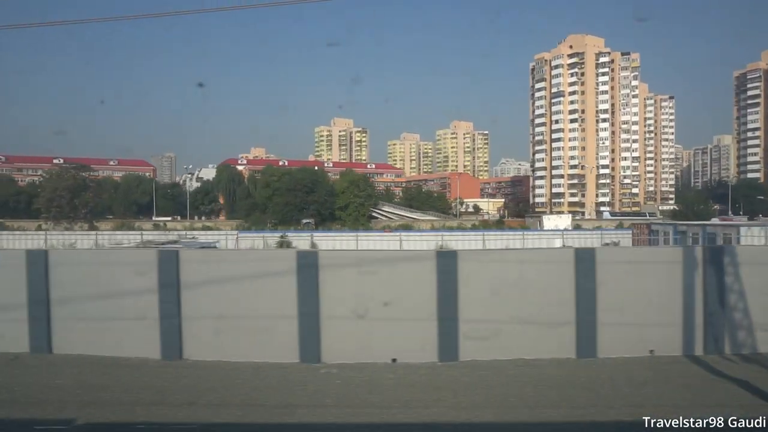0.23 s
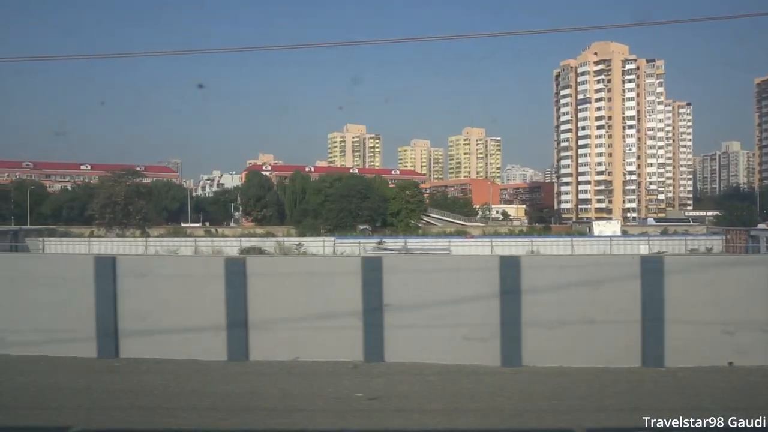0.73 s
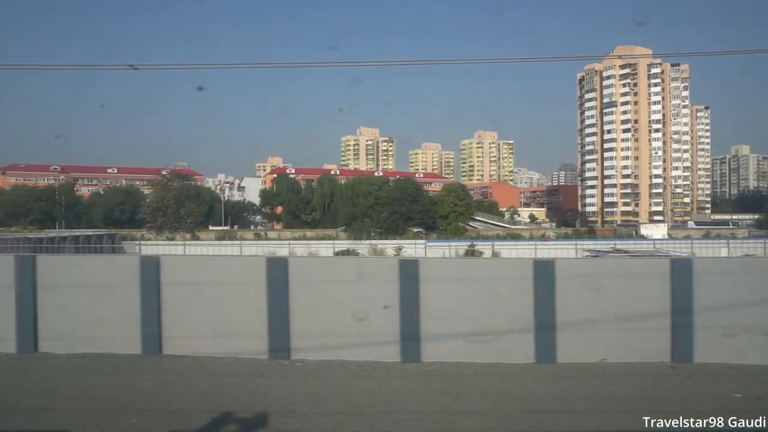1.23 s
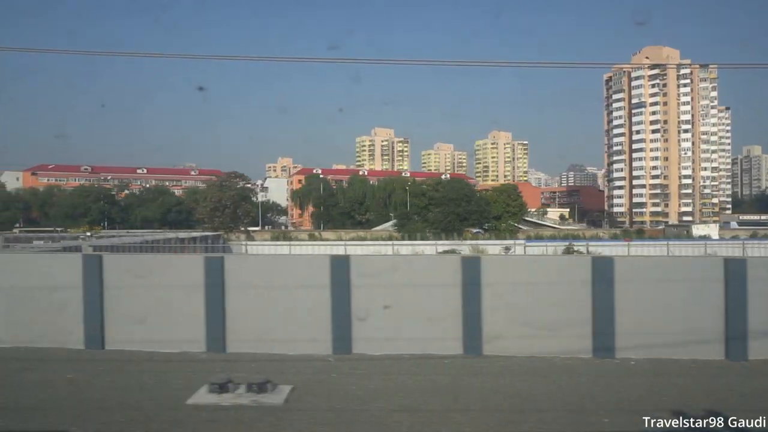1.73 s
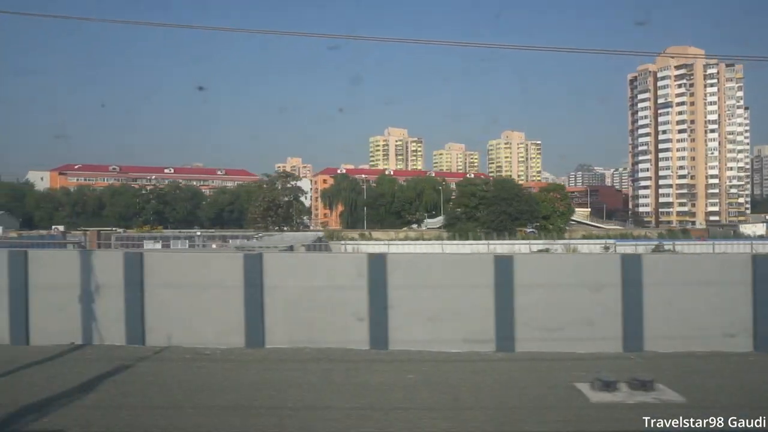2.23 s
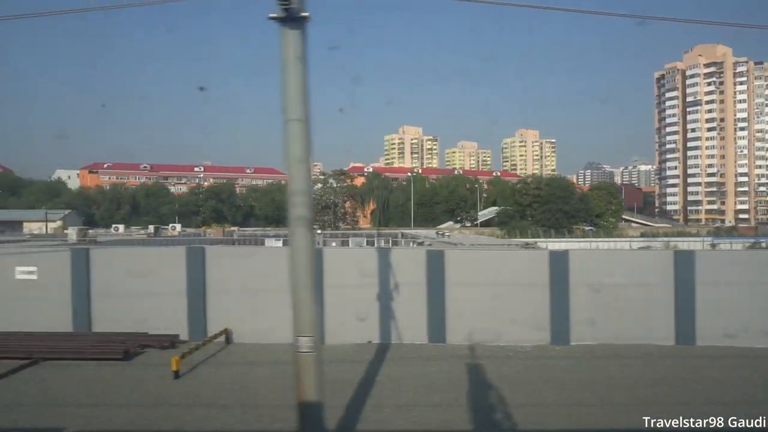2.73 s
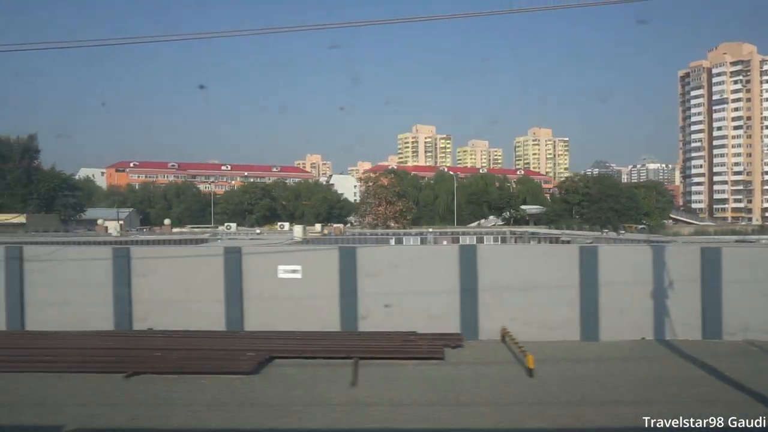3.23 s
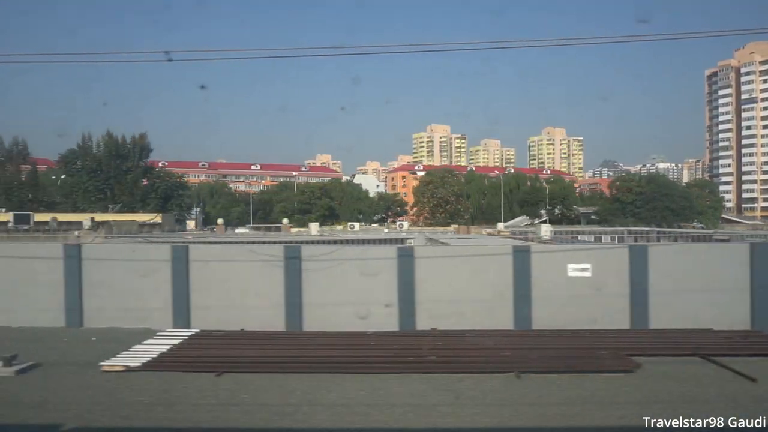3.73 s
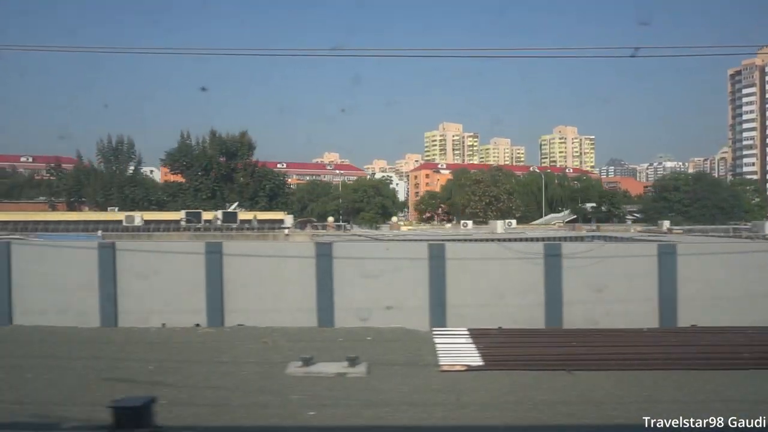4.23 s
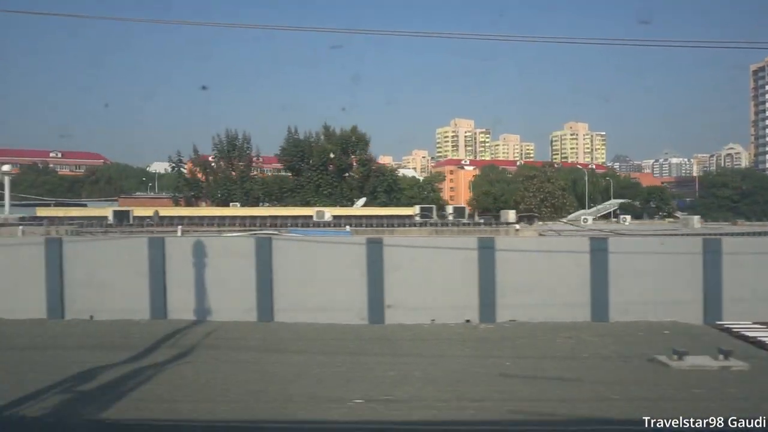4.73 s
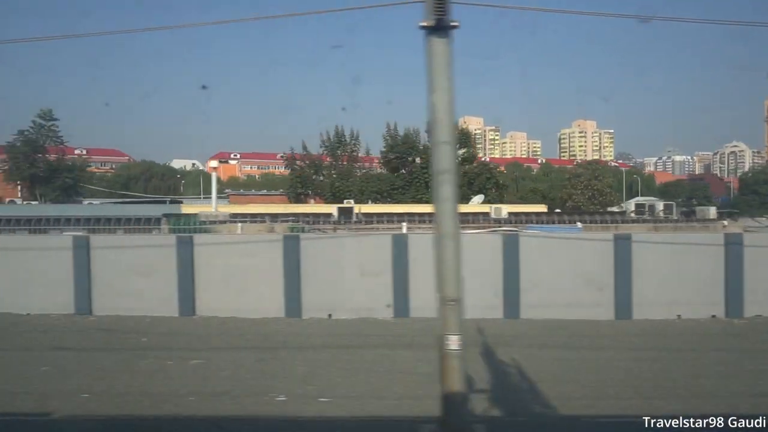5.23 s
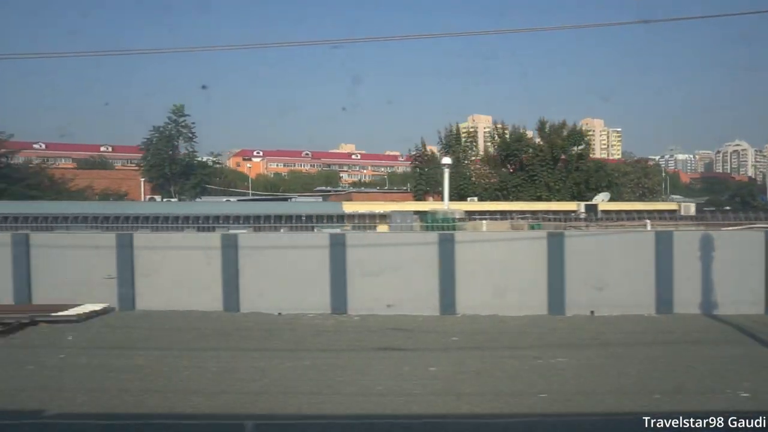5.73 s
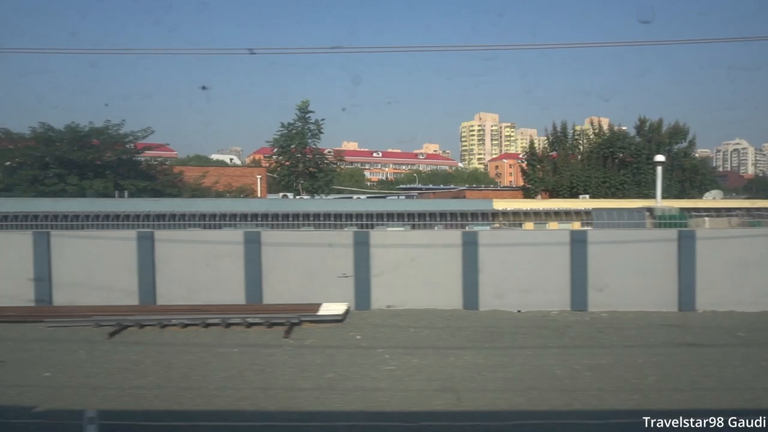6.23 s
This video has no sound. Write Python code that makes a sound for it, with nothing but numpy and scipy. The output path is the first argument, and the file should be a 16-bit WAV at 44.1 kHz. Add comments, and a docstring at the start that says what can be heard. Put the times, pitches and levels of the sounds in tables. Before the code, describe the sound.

A steady bass-heavy train rumble heard from a passenger seat, swelling with soft dull knocks around two seconds, then settling into calmer rolling.

```python
"""Rolling noise in a railway carriage: rough wheels and rails excite the floor and panels as filtered noise.
The two lowest cabin resonances boom as wavering tones; axles jolt over rail joints in bursts of noise.
The drive hums and the wheels sing as fuzzy tones, air rushes by as noise, and loose fittings ring briefly.
Thin ticks sound on the right, and a faint whine sinks at the start.
Two close microphones, alike in the bass, add hiss."""
import sys
import numpy as np
from scipy import signal
from scipy.fft import rfft, irfft
from scipy.io import wavfile
from scipy.ndimage import uniform_filter1d

SR = 44100
rng = np.random.default_rng(int(sys.argv[2]) if len(sys.argv) > 2 else 0)


def put_to_file(sound):
    """Save the sound as 16-bit audio at rate SR, in the file named by the first command-line argument."""
    columns = np.atleast_2d(sound).T  # one column per channel
    safe = np.clip(columns, -1, 1)
    whole_steps = np.round(safe * 32767)
    wavfile.write(sys.argv[1], SR, whole_steps.astype(np.int16))


N = 285768
T = np.arange(N) / SR  # time/s
HZ = np.fft.rfftfreq(N, 1 / SR)  # bin frequency/Hz

# Roughness of the track, felt by booms, underframe and floor: [t/s, roughness/dB]
TRACK_ROUGHNESS = [(0, 4.5), (.4, 0.5), (.8, 3), (1.3, -1.5), (1.7, 1.5), (2.3, 3), (3.0, 3.5), (3.3, 1),
                   (3.7, -1), (3.9, -1), (4.4, -1.5), (4.7, -2), (5.3, -1), (5.9, 0), (6.2, -1),
                   (6.48, -5.5)]
# Sway below the boom: [t/s, level/dB]
SWAY_LEVEL = [(0, -38), (.7, -38.5), (1.3, -37.5), (2, -35), (2.7, -37), (3.2, -36), (3.7, -40.5),
              (4.2, -35), (4.7, -40.5), (5.3, -39), (5.9, -36), (6.48, -39)]
# Panels and windows: [t/s, level/dB]
PANEL_LEVEL = [(0, -59), (.5, -59.5), (1.0, -62.5), (1.7, -59.5), (2.7, -60), (2.95, -58.5), (3.25, -58),
               (3.6, -61), (4.1, -60.5), (5.0, -60.5), (6.0, -60), (6.48, -60.5)]
# Spectra of sway, underframe, floor and panels, shape only: [f/Hz, density/dB per Hz]
SWAY_SPECTRUM = [(10, -16), (20, -8), (28, -4), (35, -5), (48, 0), (58, -3), (66, -4), (76, -20)]
FRAME_SPECTRUM = [(95, -23), (125, 5.5), (150, -2), (170, -0.5), (225, 1), (245, -6.5), (290, -40)]
FLOOR_SPECTRUM = [(100, -10), (200, -10.5), (260, -1), (330, -4.5), (450, -4), (620, -17), (800, -32.5)]
PANEL_SPECTRUM = [(450, -44), (620, -1.5), (900, -1.5), (1300, -8.5), (1700, -6), (2100, -12.5),
                  (2400, -16), (3200, -28)]
# Resonances of the carriage body: [f/Hz, width/Hz, level over the spectrum around it/dB]
BODY_MODES = [(154, 20.4, 3.5), (192.6, 9.8, 7), (223.6, 10.5, 3.5), (278, 32, 3), (860, 14, 4.5),
              (1088, 29, 5), (1376, 18, 5), (1520, 27, 5), (1826, 120, 3.5), (2053, 45, 5.5), (2684, 27, 4),
              (3940, 23, 5)]
# (level on even track/dB, dB gained per dB of roughness)
FRAME_RIDE, FLOOR_RIDE = (-44, 0.65), (-50, 0.47)
# Random swells of the underframe: (width/s, depth/dB)
FRAME_SWELLS = 0.04, 1.03

# Lower and upper boom: [level on even track/dB, dB gained per dB of roughness]
BOOM_RIDES = (-38, 0.72), (-41, 1.06)
# Surges where the bogie meets a dip: [t/s, lower boom level/dB, upper boom level/dB, length/s]
BOOM_SURGES = [(0.053, -31, -52, 0.054), (0.361, -41, -34.5, 0.091), (0.777, -44, -38, 0.069),
               (1.62, -36, -30, 0.04), (1.795, -39, -30.5, 0.099), (1.929, -26, -51, 0.04),
               (2.175, -23.5, -28.5, 0.035), (2.462, -33, -34.5, 0.077), (2.688, -44, -34, 0.069),
               (2.866, -24, -38, 0.13), (3.057, -27, -46, 0.038), (3.526, -34, -55, 0.19),
               (5.0, -34, -30, 0.049), (5.337, -32, -38, 0.026), (5.999, -47, -32, 0.063),
               (6.426, -26, -31.5, 0.029)]
LOWER_BOOM_HZ, UPPER_BOOM_HZ = 80.7, 99.37
BOOM_FLUTTER = 0.023, 2.37  # (width/s, depth/dB)
SURGE_RISE_S, SURGE_FALL_S = 0.022, 0.031

# Axles over rail joints: [t/s, underframe drum level/dB, drum f/Hz, thud level/dB,
# clatter level/dB, clack level/dB, length of drum and thud/s]
AXLE_JOLTS = [(0.557, -41.5, 220, -55, -59, -78, 0.068), (0.939, -46, 200.3, -51.5, -57, -69, 0.1),
              (1.158, -50, 209.5, -62, -59, -72, 0.05), (1.323, -50, 155, -50.5, -59, -73, 0.073),
              (1.53, -36.5, 219.2, -54, -80, -80, 0.027), (1.662, -32, 158.1, -39, -48.5, -56.5, 0.075),
              (1.809, -26.5, 206.5, -33.5, -43.5, -51, 0.063),
              (1.866, -30.5, 174.9, -35.5, -59, -65, 0.032), (2.048, -39, 134, -53, -61, -75, 0.087),
              (2.359, -40.5, 202, -50, -61, -82, 0.07), (2.576, -30.5, 190, -46, -52, -67, 0.024),
              (2.612, -26.5, 208.3, -47, -65, -77, 0.021), (2.712, -42, 215, -45.5, -51, -68, 0.079),
              (2.765, -42.5, 198, -48, -56, -65, 0.065), (2.944, -36, 198, -45, -56, -66, 0.061),
              (3.051, -37, 218.8, -54, -60, -70, 0.039), (3.093, -39, 215.5, -56, -53.5, -72, 0.058),
              (3.436, -39.5, 196, -58, -70, -80, 0.045), (3.671, -39.5, 221, -56, -63, -81, 0.069),
              (3.946, -42, 206.8, -54, -73, -80, 0.041), (4.2, -41, 125.4, -57, -63, -81, 0.056),
              (4.307, -39, 159, -74, -64, -83, 0.1), (5.473, -59, 210, -46, -53.5, -78, 0.027),
              (5.822, -53, 209, -55, -57.5, -69, 0.13)]
# Spectra of three parts of a jolt, shape only: [f/Hz, density/dB per Hz]
THUD_SPECTRUM = [(120, -23), (200, 2.5), (300, 11.5), (400, 11.5), (520, 9.5), (650, -6.5)]
CLATTER_SPECTRUM = [(400, -31), (580, 1), (900, 0), (1100, -6), (1300, -12), (1700, -25)]
CLACK_SPECTRUM = [(1000, -40), (1300, -11), (1550, -1), (1800, -6), (2100, -7.5), (2400, -34), (3200, -68)]
# The firm note in thud, clatter and clack: [f/Hz, width/Hz, level relative to the part/dB]
JOLT_NOTES = [(383.6, 51.2, -8.5), (711, 85.6, -9), (1530, 170, -4)]
DRUM_NOTE = 34, 0.089  # the drum's note: (width/Hz, level relative to the part/dB)

# Hums of the drive: [t/s, lower hum level/dB, upper hum level/dB]
HUM_LEVELS = [(0, -56, -67.5), (.8, -56, -70.5), (1.02, -57.5, -59.5), (1.25, -55, -64.5),
              (1.55, -50.5, -67.5), (1.85, -53, -59), (2.15, -48.5, -69), (2.38, -47.5, -56.5),
              (2.6, -57, -67), (2.78, -45, -66), (3.1, -59, -63), (3.7, -52.5, -58), (4.0, -56.5, -67),
              (4.4, -53, -60), (4.98, -58, -66), (5.23, -48.5, -63.5), (5.6, -51.5, -67),
              (6.0, -54.5, -65.5), (6.48, -59, -73)]
LOWER_HUM_HZ, UPPER_HUM_HZ = 375, 714
HUM_FLUTTER = 0.04, 1  # (width/s, depth/dB)

# Rough singing of wheel on rail: [t/s, level/dB]
SINGING_LEVEL = [(0, -77), (.45, -74), (.9, -75), (1.4, -76), (2.0, -74), (2.85, -81), (3.0, -70),
                 (3.3, -75), (3.6, -76), (4.9, -75), (5.2, -73), (5.6, -79), (6.0, -76), (6.48, -73)]
SINGING_HZ, SINGING_WIDTH_HZ = 1763, 170

# Air past the windows: [t/s, rush level/dB, whistle level/dB]
AIR_LEVELS = [(0, -68, -96), (2.7, -66, -91), (3.05, -65.5, -76), (3.5, -66.5, -82), (4.7, -66.5, -80),
              (5.2, -67, -83), (6.48, -66.5, -88)]
# Spectrum of the rush, shape only: [f/Hz, density/dB per Hz]
AIR_SPECTRUM = [(1000, -36), (2000, -6.5), (2700, -1.5), (4000, -5.5), (5000, -9), (7000, -23),
                (11500, -33)]
WHISTLE_HZ = 3550

# Rings of loose fittings: [t/s, level/dB, f/Hz, width/Hz, length/s, noise over tone]
FITTING_PINGS = [(.282, -62.5, 1765, 40, 0.04, .3), (1.17, -59.5, 1750, 60, 0.046, 0.92),
                 (3.026, -55.5, 948.4, 35, 0.036, 0.28), (6.112, -64, 1750, 220, 0.044, 2.5),
                 (6.182, -65.5, 1840, 220, 0.055, 2.5), (6.431, -60, 2160, 500, .08, 2.1)]
# Thin ticks: [t/s, peak level/dB, f/Hz, left minus right/dB, rattle level/dB, rattle length/s]
THIN_TICKS = [(.1136, -57, 8050, -1.5, -72, 0.017), (2.738, -60, 10300, -3, -66, 0.023),
              (2.835, -50.5, 10100, -7, -71, 0.054), (3.277, -54, 10100, -6, -71, .02),
              (3.328, -49, 10030, -6, -68, 0.028), (4.272, -57, 9620, -2.5, -70, 0.053),
              (4.635, -68, 9600, -2.5, -77, .03)]
# Sinking whine: [t/s, level/dB, f/Hz]
WHINE_GLIDE = [(0, -79, 513), (.1, -54, 497), (.3, -55.5, 477), (.45, -69, 462), (.6, -51, 451),
               (.75, -69, 458), (1.0, -65, 435), (1.2, -80, 425)]

# The field at the microphones: [f/Hz, left-right coherence]
COHERENCE = [(40, 0.99), (90, 1), (180, 0.99), (350, 1), (800, 0.62), (1600, 0.21), (3000, 0.093),
             (11000, 0.19)]
# [f/Hz, phase by which left leads/rad]
LEFT_LEAD = [(60, 0), (180, 0.2), (350, 0.49), (600, 0.79), (1800, 1), (2800, 0), (4000, 0)]
# [f/Hz, left minus right/dB]
LEFT_TILT = [(60, 0.1), (800, 0.3), (1500, -1.1), (11000, -0.5)]
# Spectrum of the hiss, shape only: [f/Hz, density/dB per Hz]
HISS_SPECTRUM = [(1500, -17), (4000, -11), (6000, -1), (11500, -3)]
HISS_DB, BAND_EDGE_HZ = -67.5, 11050


def rolling():
    """Forced vibration: one contact roughness drives underframe, floor and panels; sway lies beneath."""
    contact = unevenness(0.035, 1.3)
    sway = gain_of(curves(SWAY_LEVEL)[0]) * carriage(SWAY_SPECTRUM, 1)
    # underframe and panels follow the contact less than the floor does
    frame_drive = ridden(FRAME_RIDE) * contact ** 0.46 * evened(unevenness(*FRAME_SWELLS))
    panel_drive = gain_of(curves(PANEL_LEVEL)[0]) * contact ** 0.47
    frame = carriage(FRAME_SPECTRUM, frame_drive)
    floor = carriage(FLOOR_SPECTRUM, ridden(FLOOR_RIDE) * contact)
    panels = carriage(PANEL_SPECTRUM, panel_drive)
    return sway + frame + floor + panels


def boom():
    """Modal resonance: the two lowest cabin modes flutter at random and surge where the bogie meets a dip."""
    lower = wavering(LOWER_BOOM_HZ, 4.48, 0.0604, 26, 0.21, 0.064)
    upper = wavering(UPPER_BOOM_HZ, 7.11, 0.0397, 21.3, 0.68, 0.046)
    out = 0
    for k, tone in enumerate((lower, upper)):
        surges = 0
        for row in BOOM_SURGES:
            envelope = burst(row[0], row[-1], rise=SURGE_RISE_S, fall=SURGE_FALL_S)
            surges = surges + gain_of(row[1 + k]) * envelope
        steady = ridden(BOOM_RIDES[k]) * evened(unevenness(*BOOM_FLUTTER))
        out = out + tone * np.hypot(steady, surges)  # powers add
    return out


def jolts():
    """Impact excitation: each axle shakes four bands of the body, clatter and clack held for less time."""
    drum, thud, clatter, clack = np.zeros((4, N))
    for s, drum_db, _, thud_db, clatter_db, clack_db, length in AXLE_JOLTS:
        drum += gain_of(drum_db) * burst(s, length, rise=0.025, fall=0.014)
        thud += gain_of(thud_db) * burst(s, length, rise=0.022, fall=0.014)
        clatter += gain_of(clatter_db) * burst(s, 0.65 * length, rise=0.007, fall=0.022)
        clack += gain_of(clack_db) * burst(s, 0.5 * length, rise=0.008, fall=0.02)
    # the drum note takes the pitch of the latest jolt
    starts, _, pitches = np.transpose(AXLE_JOLTS)[:3]
    drum_hz = pitches[np.maximum(np.searchsorted(starts, T) - 1, 0)]
    spectra = FRAME_SPECTRUM, THUD_SPECTRUM, CLATTER_SPECTRUM, CLACK_SPECTRUM
    notes = [(drum_hz, *DRUM_NOTE), *JOLT_NOTES]
    out = 0
    for spectrum, shake, (hz, width, db) in zip(spectra, (drum, thud, clatter, clack), notes):
        noise = carriage(spectrum, 1)
        note = gain_of(db) * wavering(hz, 0.2 * width, 0.02, width, 0.6, 0.13)
        out = out + shake * (noise + note)
    return out


def hums():
    """Structure-borne sound: two fuzzy, fluttering tones of the drive carried through the floor."""
    lower_db, upper_db = curves(HUM_LEVELS)
    lower = wavering(LOWER_HUM_HZ, 9, 0.03, 40, 2.5, 0.15) * evened(unevenness(*HUM_FLUTTER))
    upper = wavering(UPPER_HUM_HZ, 8, 0.03, 36, 1.8, 0.35) * evened(unevenness(*HUM_FLUTTER))
    return gain_of(lower_db) * lower + gain_of(upper_db) * upper


def singing():
    """Resonance of a wheel on the rail: a mostly noisy band around one frequency."""
    tone = wavering(SINGING_HZ, 15, 0.03, SINGING_WIDTH_HZ, 3, 0.8)
    return gain_of(curves(SINGING_LEVEL)[0]) * tone


def air():
    """Flow noise: a wide rush past the windows with a thin whistle in it."""
    rush_db, whistle_db = curves(AIR_LEVELS)
    rush = carriage(AIR_SPECTRUM, gain_of(rush_db))
    whistle = wavering(WHISTLE_HZ, 22, 0.031, 60, 2.0, 0.8)
    return rush + gain_of(whistle_db) * whistle


def pings():
    """Brief resonance of fittings: narrow rings and rough squeaks, not quite alike at the microphones."""
    out = 0
    for s, db, hz, width, length, fuzz in FITTING_PINGS:
        ring = wavering(hz, 0.116 * width, 0.0088, width, fuzz, 0.46)
        out = out + gain_of(db) * burst(s, length, fall=0.0063) * ring
    return out


def ticks(width=1300, gap_s=0.0015):
    """Impulsive sound: a double click as two short wave packets in a high band, with a short rattle."""
    out = np.zeros((2, N))
    for s, db, hz, pan_db, rattle_db, length in THIN_TICKS:
        click = 0
        for at in (s + 0.0011, s + 0.00098 + gap_s):
            u = T - at
            click = click + np.exp(-(u / 0.00027) ** 2) * np.cos(2 * np.pi * hz * u)
        rattle = evened(noise_band(hz, width))
        rattle = gain_of(rattle_db) * burst(s, length, rise=0.0031, fall=0.012) * rattle
        pan = gain_of([[pan_db / 2], [-pan_db / 2]])
        out += (gain_of(db) * click + rattle) * pan
    return out


def whine():
    """Frequency glide: the phase integrates a sinking pitch, and narrow noise makes the tone fuzzy."""
    level_db, hz = curves(WHINE_GLIDE)
    tone = evened(np.sin(2 * np.pi * np.cumsum(hz) / SR))
    fuzz = evened(resonate(rng.standard_normal(N), hz, 31))
    return gain_of(level_db) * (tone + 0.5 * fuzz) * (T < WHINE_GLIDE[-1][0])


def carriage(spectrum, drive):
    """Source and filter: driven noise excites the body modes; two microphones hear a partly coherent field."""
    ringing = sum((gain_of(db) - 1) / (1 + 2j * (HZ - hz) / width) for hz, width, db in BODY_MODES)
    response = gain_of(read(spectrum)) * (1 + ringing)
    # steep roll-off above the last frequency of the spectrum
    response /= np.maximum(HZ / spectrum[-1][0], 1) ** 8
    response /= np.sqrt(np.mean(abs(response) ** 2))
    left, other = rfft(rng.standard_normal((2, N)) * drive)
    same = np.clip(read(COHERENCE), 0, 1)
    right = same * left + np.sqrt(1 - same ** 2) * other
    right = right * np.exp(-1j * read(LEFT_LEAD))
    tilt = gain_of(read(LEFT_TILT) / 2)
    return irfft(np.array([left * tilt, right / tilt]) * response, N)


def wavering(hz, wander_hz, slow_s, width, fuzz, apart):
    """Frequency modulation: a tone of wandering pitch with a noise skirt, partly opposed left and right."""
    wander = wander_hz * evened(slow_noise(slow_s))
    tone = evened(np.sin(2 * np.pi * np.cumsum(hz + wander) / SR))
    skirt, side = evened(noise_band(hz, width))
    return evened(tone + fuzz * skirt) + apart * side * np.array([[1], [-1]])


def unevenness(width_s, depth_db):
    """Amplitude modulation: a gain that swells at random, its depth an rms in decibels."""
    return gain_of(depth_db * evened(slow_noise(width_s)))


def slow_noise(width_s):
    """Low-pass filtering: noise smoothed by two moving averages of the given width."""
    size = max(int(width_s * SR), 1)
    return uniform_filter1d(uniform_filter1d(rng.standard_normal(N), size), size)


def noise_band(hz, width):
    """Cascaded resonance: two channels of noise passed twice through one resonator."""
    return resonate(resonate(rng.standard_normal((2, N)), hz, width), hz, width)


def resonate(x, hz, width):
    """Heterodyne resonator: shifts the curve hz down to zero, smooths, and shifts back."""
    turn = np.exp(2j * np.pi * np.cumsum(hz * np.ones(N)) / SR)
    r = np.exp(-np.pi * width / SR)
    return 2 * (turn * signal.lfilter([1 - r], [1, -r], x / turn)).real


def burst(s, length, rise=0.014, fall=0.02):
    """Transient envelope: rises at s, sags while held, and decays exponentially after length; all in s."""
    out = np.zeros(N)
    span = slice(int(s * SR), int((s + length + 12 * fall) * SR))
    u = T[span] - s
    sag = 1 - 0.31 * np.clip(u / length, 0, 1)
    out[span] = np.clip(u / rise, 0, 1) * sag * np.exp(-np.maximum(u - length, 0) / fall)
    return out


def ridden(level):
    """Roughness excitation: a gain whose decibels follow the roughness of the track."""
    level_db, share = level
    return gain_of(level_db + share * curves(TRACK_ROUGHNESS)[0])


def read(points):
    """Interpolation of a table over log frequency, at every bin."""
    f, value = np.transpose(points)
    return np.interp(np.log(HZ + 1), np.log(f + 1), value)


def curves(rows):
    """Linear interpolation of the columns of a table over time, at every sample."""
    s, *columns = np.transpose(rows)
    return [np.interp(T, s, c) for c in columns]


def gain_of(db):
    """Level definition: decibels to amplitude gain."""
    return 10 ** (np.asarray(db) / 20)


def evened(x):
    """Normalisation to an rms of 1."""
    return x / np.sqrt(np.mean(x ** 2) + 1e-20)


def scene():
    """Superposition of all sources in the carriage."""
    return boom() + hums() + singing() + rolling() + air() + jolts() + pings() + ticks() + whine()


def record(dry):
    """Transduction: the microphones add hiss, a small part of it shared; then a low-pass band limit."""
    hiss = irfft(rfft(rng.standard_normal((2, N))) * gain_of(read(HISS_SPECTRUM)), N)
    part_shared = evened(hiss + 0.1 * hiss[::-1])
    wet = dry + gain_of(HISS_DB) * part_shared * gain_of([[-0.4], [0.4]])
    low_pass = signal.firwin(1023, BAND_EDGE_HZ, window=("kaiser", 9), fs=SR)
    return signal.oaconvolve(wet, low_pass[None], "same")


dry = scene()
out = record(dry)
put_to_file(out)
```